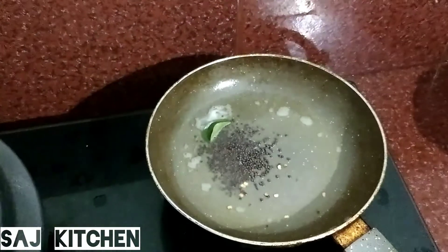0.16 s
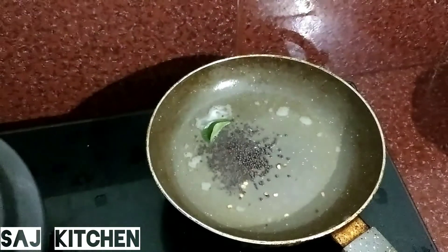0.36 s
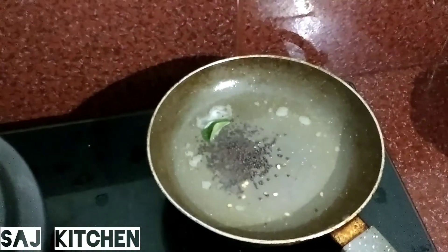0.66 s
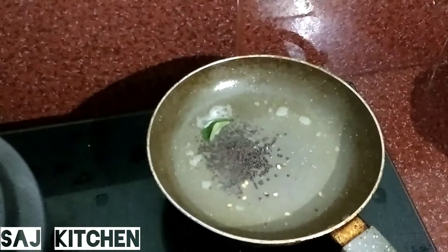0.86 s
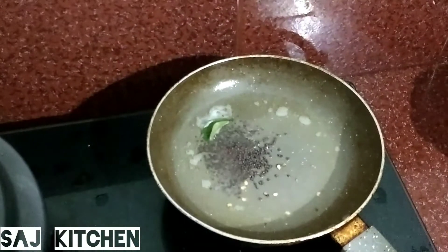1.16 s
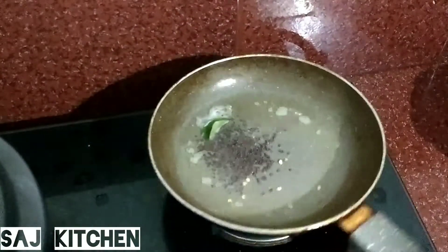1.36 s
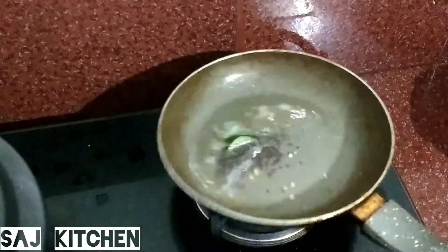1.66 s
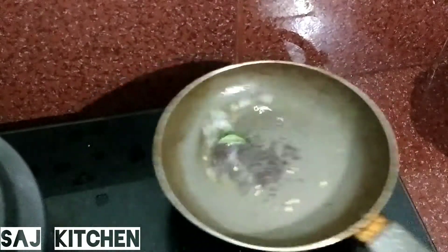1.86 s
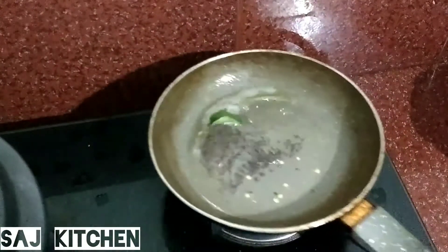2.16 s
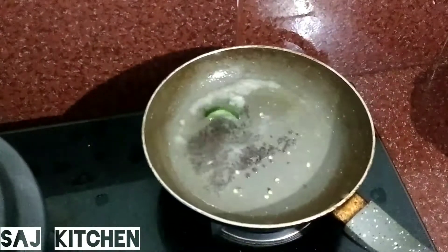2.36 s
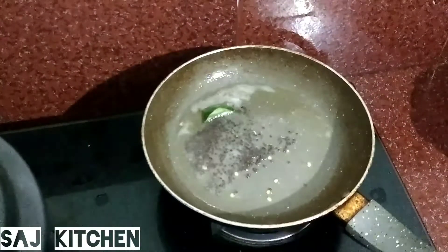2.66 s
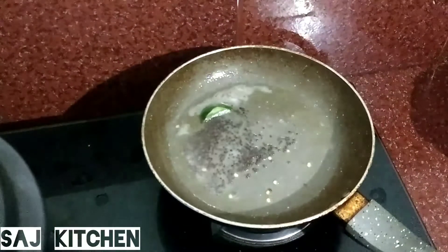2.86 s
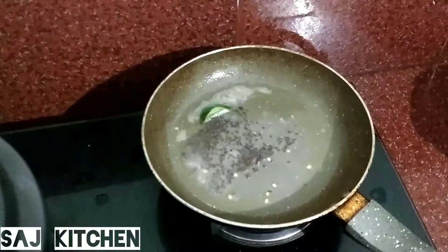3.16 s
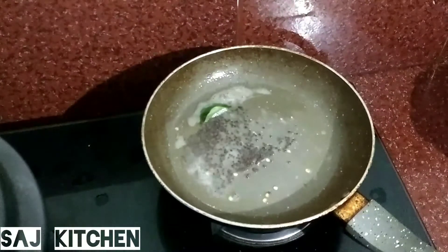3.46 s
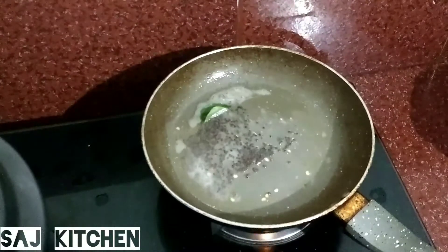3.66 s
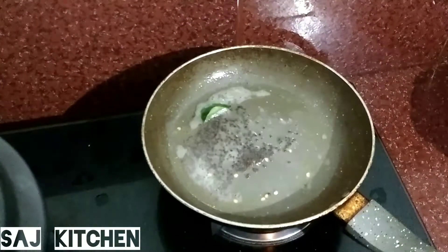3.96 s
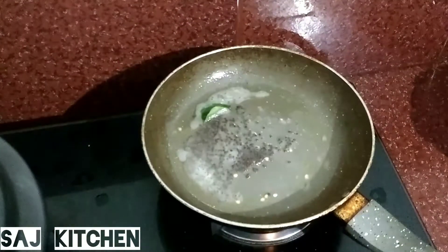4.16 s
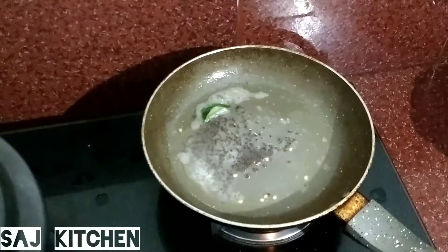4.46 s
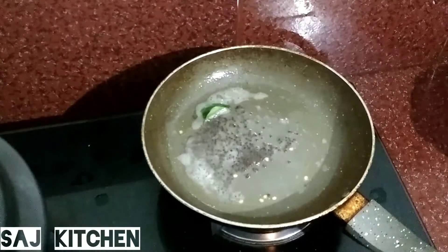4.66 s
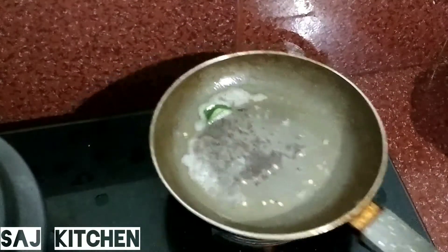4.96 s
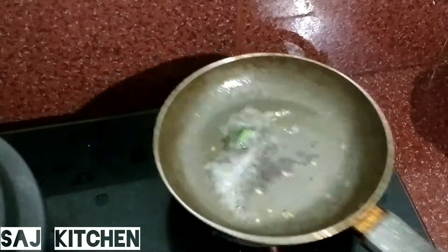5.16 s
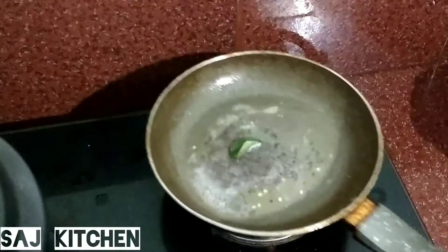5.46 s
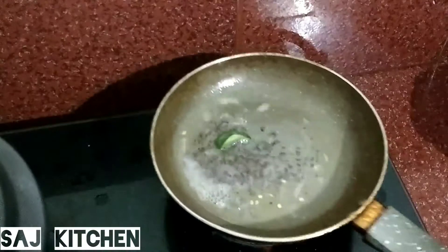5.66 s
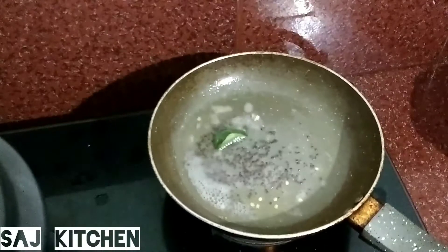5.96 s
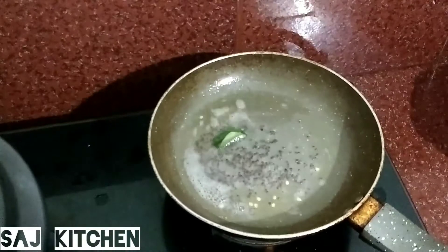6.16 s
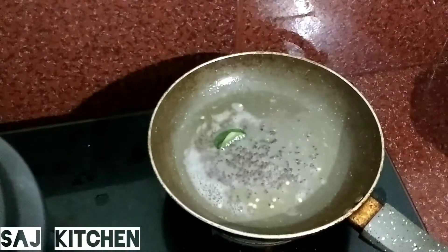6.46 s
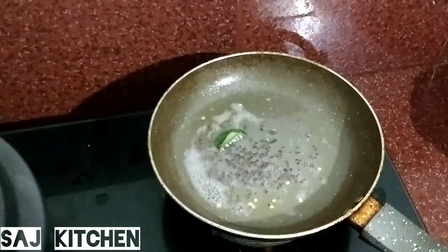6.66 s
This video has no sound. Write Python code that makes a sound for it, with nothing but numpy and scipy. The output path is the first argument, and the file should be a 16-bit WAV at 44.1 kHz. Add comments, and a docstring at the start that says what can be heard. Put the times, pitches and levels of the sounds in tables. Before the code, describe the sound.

In a reverberant home kitchen, something slides briefly, then a steel vessel clangs brightly and rattles. The frying pan bangs and scrapes on its trivet in an uneven run. Afterwards hot oil sizzles faintly while mustard seeds pop one by one, two dull put-down knocks intervene, and the pan scrapes again softly over a brief low rumble. Close stereo phone pickup.

```python
"""Hot oil and mustard seeds in a pan on a gas stove, heard at a phone's two ports in a hard-walled kitchen.
Throughout: filtered clicks as froth and a high hiss, noise as air. First something slides further off (hiss,
sinking note), then a steel vessel clangs and rattles and the pan knocks and scrapes on its trivet (struck,
rubbed modes). Seeds pop from then on (click, ring, steam); midway a duller object is put down twice (damped
modes). Later the pan knocks and scrapes again, ending over a low rumble (wavering tone, noise)."""
import sys
import numpy as np
from scipy import signal
from scipy.fft import rfft, irfft, next_fast_len
from scipy.io import wavfile
from scipy.ndimage import uniform_filter1d

SR = 44100
rng = np.random.default_rng(int(sys.argv[2]) if len(sys.argv) > 2 else 0)


def unload_wav(signal):
    """Save mono or channel-first audio to the path in sys.argv[1] as 16-bit WAV at rate SR, clipped to [-1, 1]."""
    wavfile.write(
        sys.argv[1],
        SR,
        np.round(np.clip(np.atleast_2d(signal).T, -1, 1) * 32767).astype(np.int16),
    )


N = 299423
T = np.arange(N) / SR

# kitchen air spectrum: freq_hz, density_db_per_hz
AIR_COLOUR = [(18, -55), (30, -36), (87, -6), (128, -9), (157, -4), (378, -5.5), (651, -2.5), (1120, -1),
              (1530, -10), (1700, -9.5), (2500, -12.5), (2990, -10.5), (3680, -6), (8210, -16.5),
              (14500, -22)]
# high hiss, swelling with the vessel clatter and the pan noise: time_s, level_db
HISS_LEVEL = [(0.0, -65), (0.5, -67), (0.76, -55), (1.5, -57), (1.9, -58), (2.29, -55), (2.42, -60),
              (3.0, -62), (4.95, -64.5), (5.12, -54.5), (6.0, -62.5), (6.79, -59.5)]
# swells of large bubbles frothing in the oil: start_s, length_s, level_db
FROTH_SWELLS = [(2.48, 0.12, -60), (3.475, 0.15, -50), (4.208, 0.56, -55), (4.908, 0.68, -57)]
# reverberation time: freq_hz, t60_s
ROOM_T60 = [(100, 0.63), (500, 0.68), (2000, 0.66), (6000, 0.63), (14000, 0.3)]
# port mismatch: freq_hz, left_minus_right_db
PORT_BALANCE = [(60, 18), (110, 11.5), (200, 14.5), (380, 8.5), (700, -3), (1290, 1), (2380, 0),
                (4400, -0.5), (8120, 0), (15000, 5)]
# sliding friction spectrum: freq_hz, density_db_per_hz
SLIDE_COLOUR = [(35, -46), (60, 13.5), (160, -11.5), (234, -3.5), (418, -19), (780, -3.5), (1270, -7.5),
                (1600, -10.5), (4020, -11.5), (5060, -13.5), (9020, -20), (13700, -40), (15000, -62)]
# blows: start_s, peak_db, favoured_mode_hz, bass_share_db, treble_share_db, left_minus_right_db (held to +-8)
VESSEL_BLOWS = [(0.4391, -4, 3614, -28.5, -5.5, -0.5), (0.7103, -25, 1553, -11, -27, 9),
                (0.7311, -23, 3654, -7, -40, 5), (0.841, -18, 2220, -7, 2, 17)]
BLOCK_BLOWS = [(3.42, -34, 834, -19, -23, 0.0), (3.495, -17, 805, -17, -13, -0.5),
               (4.153, -27, 822, -11, -18.5, 0.0)]
PAN_BLOWS = [(1.368, -26, 980, -20.5, -34, 0), (1.516, -22, 924, -35.5, -32, 2),
             (1.587, -5, 883, -9, -12, 0), (1.686, -7, 943, -38, -26.5, 5),
             (1.762, -10, 1545, -23, -28.5, -0.5), (1.803, -17, 895, -49, -26, 0),
             (1.845, -13.5, 1572, -19, -30, -1), (2.174, -14, 1532, -20.5, -13, -1),
             (2.206, -6, 1020, -21.5, -15, -2.5), (2.31, -20, 1607, -31.5, -21.5, 8),
             (5.004, -24.5, 1070, -16, -9, -1), (5.084, -28.5, 1014, -29, -24, -1),
             (5.121, -31, 960, -3, -8, -3), (5.18, -30, 976, -8, -19, -6),
             (5.26, -18, 1584, -16, -29, -3.5)]
# resonances of each body: freq_hz, width_hz, level_db
VESSEL_MODES = [(760, 143, -20.5), (1210, 30, -4.5), (1402, 150, -9), (1585, 67, -7.5), (1750, 79, -8.5),
                (1880, 53, -7.5), (2132, 50, 0.5), (2275, 59, -5), (2480, 43, -7.5), (2827, 110, -2.5),
                (3190, 140, -7), (3606, 14, -2), (3676, 25, 2), (3718, 22, 7), (4040, 65, -14),
                (4120, 41, -1), (5160, 68, -7), (6097, 53, 5), (6150, 110, -4), (6480, 51, -9.5),
                (7550, 46, -4), (9084, 27, 2), (9025, 62, -4.5), (9500, 24, -32), (10170, 38, -25),
                (11940, 50, -18), (12300, 50, -20), (12600, 51, -30), (13200, 60, -29)]
BLOCK_MODES = [(246, 30, -34), (320, 35, -7), (437.5, 13, 7), (523, 25, 6), (654, 52, 2), (776, 26, 6.5),
               (1094, 61, -5), (1480, 340, 0.5), (2180, 190, -36), (2810, 93, 4.5), (3500, 150, -37),
               (4380, 270, -14)]
PAN_MODES = [(170.5, 6, -10.5), (236.3, 16.3, -13), (292.3, 3.2, -13.5), (465, 16, -8), (545.4, 15, -5.5),
             (637, 2.9, -11.5), (797, 31, -8), (901, 27, -6), (1004, 54, -16.5), (1160, 17.6, -5),
             (1232, 98, -11), (1461, 59, -5.5), (1551, 22, -2), (1805, 190, -12), (2090, 16, -34),
             (2464, 125, -8.5), (3203, 20, -24), (3510, 85, -20), (4030, 45, -23), (5310, 350, -20),
             (6315, 120, -30), (7400, 200, -41)]
# contact crack spectrum: freq_hz, density_db_per_hz
VESSEL_CRACK = [(180, -68), (300, -21.5), (1230, 2), (3120, -10), (3610, 5.5), (4620, -11), (6840, -17),
                (9180, -18.5), (13400, -33.5), (15000, -42)]
BLOCK_CRACK = [(59, -51), (100, -14), (814, 5), (1210, -7), (2990, -5.5), (4640, -12.5), (5150, -23),
               (9460, -28), (13200, -36), (15000, -51)]
PAN_CRACK = [(59, -40), (100, -21.5), (633, -0.5), (962, -4.5), (2000, -7), (2470, -14), (2990, -14.5),
             (8520, -24), (13500, -44), (15000, -57)]
# rubbing strokes: start_s, length_s, level_db, upper_over_lower_modes_db, favoured_mode_hz
VESSEL_STROKES = [(0.44, 0.087, -30.5, 0, 3600), (0.55, 0.11, -45.5, -3, 3400),
                  (0.705, 0.096, -37, -11.5, 1330), (0.835, 0.013, -35.5, -3, 2430),
                  (0.88, 0.071, -50.5, -6, 2300)]
BLOCK_STROKES = [(3.47, 0.051, -39, -17, 452), (4.13, 0.05, -46, 1, 790)]
PAN_STROKES = [(1.36, 0.1, -58.5, 8, 937), (1.465, .075, -41.5, 3.5, 905), (1.6, .1, -36, 2, 884),
               (1.77, 0.072, -45.5, 7, 905), (1.86, 0.15, -53, 7.5, 1510), (2.2, 0.1, -44.5, 1, 1080),
               (4.92, 0.13, -55.5, 0.5, 1590), (5.05, 0.048, -55, 2, 975), (5.17, 0.11, -54.5, 2, 1000),
               (5.27, 0.22, -53, -11.5, 1550), (5.46, 0.37, -56.5, -0.5, 1634)]
# seeds bursting: start_s, peak_db, ring_hz, left_minus_right_db (held to +-8), steam_db
SEED_POPS = [(1.893, -28, 7230, -7, -16), (2.1274, -37, 8580, -8, -23), (2.5948, -31, 6740, 7, -24),
             (2.6792, -40, 9300, 7, -22), (2.7834, -29, 7900, 8, -25), (2.842, -39, 7250, -4, -22),
             (3.2795, -29, 8840, -1, -21), (3.606, -35, 9810, 9, -24), (4.302, -18.5, 8300, 13, -35),
             (4.672, -34, 8160, 8, -19), (4.9387, -32.5, 9000, 8, -9), (5.957, -36.5, 9200, 10, -24),
             (6.123, -41, 8900, 9, -22), (6.276, -21, 8180, 10, -12), (6.4721, -41, 9200, 10, -18),
             (6.727, -35, 9440, 8, -23)]

AIR_DB = -55
FROTH_HZ, FROTH_WIDTH_HZ = 2780, 4700  # one pass of two
FROTH_FLOOR_DB, FROTH_ATTACK_S, FROTH_RELEASE_S = -64.5, 0.13, 0.056
RUMBLE_HZ, RUMBLE_WIDTH_HZ = 96, 15
RUMBLE_S, RUMBLE_LENGTH_S, RUMBLE_DB = 5.31, 0.43, -51.5
RUMBLE_ATTACK_S, RUMBLE_RELEASE_S = 0.092, 0.08
SLIDE_S, SLIDE_LENGTH_S, SLIDE_DB = 0.0795, 0.336, -46
SLIDE_ATTACK_S, SLIDE_RELEASE_S = 0.034, 0.021
SLIDE_HZ, SLIDE_SAG_HZ_PER_S = 308, 150
SOFTENING = 0.4  # dB of contact time gained per dB of lighter blow
POP_CLICK_DB = -9.5
NOTCH_HZ, NOTCH_WIDTH_HZ, NOTCH_DEPTH = 5165, 1100, 0.55
PORT_LAG_S = 0.00005
FADE_HZ, FADE_DB, TOP_HZ = 14350, -32, 15600


def undb(db):
    """Amplitude ratio of a level in dB."""
    return 10 ** (np.asarray(db) / 20)


def level(x, db):
    """Set the RMS level."""
    return x * undb(db) / np.sqrt(np.mean(x ** 2))


def read(table, hz):
    """Value of a (freq_hz, value) table on a log-frequency axis."""
    freq_hz, value = np.transpose(table)
    return np.interp(np.log(np.maximum(hz, 1)), np.log(freq_hz), value)


def curve(table):
    """Gain of a (time_s, level_db) curve."""
    return undb(np.interp(T, *np.transpose(table)))


def colour(x, gain):
    """Filter by a gain given as a function of frequency."""
    size = next_fast_len(N + SR)
    return irfft(rfft(x, size) * gain(np.fft.rfftfreq(size, 1 / SR)), size)[..., :N]


def resonance(hz, centre_hz, width_hz):
    """Response of one damped mode, unity at its centre."""
    return 1j * hz * width_hz / (centre_hz ** 2 - hz ** 2 + 1j * hz * width_hz)


def walk(rate_hz):
    """Random levels held 1 / rate_hz and slewed twice."""
    k = int(SR / rate_hz)
    steps = np.repeat(rng.standard_normal(N // k + 1), k)
    return uniform_filter1d(uniform_filter1d(steps, k), k)[:N]


def pair(split_hz, size):
    """Two noises that agree in the bass and part above split_hz."""
    both, left, right = rfft(rng.standard_normal((3, size)))
    share = 1 / (1 + (np.fft.rfftfreq(size, 1 / SR) / split_hz) ** 2)
    return irfft(np.sqrt(share) * both + np.sqrt(1 - share) * np.array([left, right]), size)


def grit(rate_hz, spread_db, channels):
    """Random clicks: most small, a few larger."""
    chance = rng.random((3, channels, N))
    size = np.minimum(-np.log(1 - chance[1]), 3.5)
    return (chance[0] < rate_hz / SR) * undb(spread_db * size) * np.sign(chance[2] - 0.5)


def swell(start_s, length_s, db, attack_s, release_s):
    """Gain that rises at start_s, holds until length_s has passed and dies away."""
    rise = np.clip((T - start_s) / attack_s, 0, 1) ** 2
    return undb(db) * rise * np.exp(-np.maximum(T - start_s - length_s, 0) / release_s)


def add(out, start_s, sound, peak_db, pan_db):
    """Place a sound at its peak level and side."""
    i, pan_db = int(start_s * SR), np.clip(pan_db, -8, 8)
    sound = sound[..., :N - i] / np.abs(sound).max()
    out[:, i:i + sound.shape[-1]] += sound * undb(peak_db + np.array([[pan_db], [-pan_db]]) / 2)


def room(onset_s):
    """Kitchen tail at both ports: noise whose octaves fade at their own speed."""
    noise, t, tail = pair(615, SR), T[:SR], 0
    for hz in 62.5 * 2.0 ** np.arange(9):
        edges_hz = [hz / np.sqrt(2), min(hz * np.sqrt(2), 0.49 * SR)]
        band = signal.sosfilt(signal.butter(2, edges_hz, "band", fs=SR, output="sos"), noise)
        tail = tail + band * np.exp(-np.log(1000) * t / read(ROOM_T60, hz))
    tail = tail * np.clip(t / onset_s, 0, 1)
    return tail / np.sqrt((tail ** 2).sum(axis=1, keepdims=True))


def kitchen_air():
    """Steady broadband noise, its level wavering slightly."""
    air = colour(pair(360, N), lambda f: undb(read(AIR_COLOUR, f)))
    return level(air, AIR_DB) * undb(0.66 * walk(7.7))


def froth_and_hiss():
    """Random clicks through a broad band (bubbles frothing in the oil) and a higher band (hiss)."""
    grains = grit(4000, 4.1, channels=2)
    froth = level(colour(grains, lambda f: resonance(f, FROTH_HZ, FROTH_WIDTH_HZ) ** 2), 0)
    swells = sum(swell(*row, FROTH_ATTACK_S, FROTH_RELEASE_S) for row in FROTH_SWELLS)
    froth = froth * (undb(FROTH_FLOOR_DB) + swells)
    # sparse louder clicks stand out of the hiss
    grains = grains + undb(14) * grit(25, 2.5, channels=1)
    hiss = level(colour(grains, lambda f: resonance(f, 7700, 3700) ** 2), 0)
    return froth + hiss * curve(HISS_LEVEL) * undb(1.1 * walk(4.62))


def rumble():
    """Stove-top hum, wavering in pitch and level, over low resonant noise."""
    turns = RUMBLE_HZ * np.cumsum(1 + 0.019 * walk(19)) / SR
    hum = level(np.sin(2 * np.pi * turns) * undb(1.8 * walk(17)), -5.5)

    def shape(f):
        low = resonance(f, RUMBLE_HZ, RUMBLE_WIDTH_HZ) + undb(-28) * resonance(f, 47, 40)
        return low + undb(4) * resonance(f, 186, 115)

    noise = level(colour(rng.standard_normal(N), shape), 0.5)
    envelope = swell(RUMBLE_S, RUMBLE_LENGTH_S, RUMBLE_DB, RUMBLE_ATTACK_S, RUMBLE_RELEASE_S)
    return envelope * (hum + noise)


def slide():
    """Friction hiss plus a hollow body note that sinks as the object slows."""
    note_hz = SLIDE_HZ - SLIDE_SAG_HZ_PER_S * np.clip(T - SLIDE_S, 0, SLIDE_LENGTH_S)
    phase = 2 * np.pi * np.cumsum(note_hz) / SR
    note = level(walk(87.7) * np.cos(phase) + walk(89) * np.sin(phase), -15)
    hiss = level(colour(rng.standard_normal(N), lambda f: undb(read(SLIDE_COLOUR, f))), 0)
    envelope = swell(SLIDE_S, SLIDE_LENGTH_S, SLIDE_DB, SLIDE_ATTACK_S, SLIDE_RELEASE_S)
    return envelope * (hiss * undb(1.8 * walk(27.6)) + note)


def blows(hits, modes, crack_colour, knee_hz, favour_db, contact_ms_at_0db,
          clank_db, clank_s, crack_db, crack_s):
    """Each blow lands elsewhere, so the modes ring in a new mix; a damped clank and a crack lead."""
    out, t = np.zeros((2, N)), T[:SR // 2]
    hz, width_hz, mode_db = np.transpose(modes)[:, :, None]
    f = np.fft.rfftfreq(len(t), 1 / SR)[1:]
    usual_bass_db, usual_treble_db = np.mean(hits, axis=0)[3:5]
    for start_s, peak_db, favour_hz, bass_db, treble_db, pan_db in hits:
        def tilt(f):
            # soft contacts give more bass, hard ones more treble than the usual blow
            bass = (bass_db - usual_bass_db) * np.clip(np.log2(knee_hz / f / 2), 0, 1)
            return bass + (treble_db - usual_treble_db) * np.clip(np.log2(f / knee_hz), 0, 1)

        chance = rng.standard_normal((3, len(modes), 1))
        mix_db = mode_db + tilt(hz) + 2.0 * chance[0]
        mix_db = mix_db + favour_db * np.exp(-(np.log(hz / favour_hz) / 0.04) ** 2)
        # higher modes reach the two ports out of step
        skew = chance[2] * np.minimum(hz / 1500, 1) * np.array([0.5, -0.5])[:, None, None]
        phase = 2 * np.pi * (hz * t + chance[1]) + skew
        decay = np.exp(-np.pi * width_hz * t)
        ring = (undb(mix_db) * width_hz * decay * np.sin(phase)).sum(axis=1)
        clank = undb(clank_db) * np.exp(-t / clank_s) * (1 - np.exp(-t / 0.0037))
        clank = clank * np.sin(2 * np.pi * favour_hz * t)
        spectrum = rfft(pair(1820, len(t)))[:, 1:] * undb(read(crack_colour, f) + tilt(f))
        crack = irfft(np.pad(spectrum, ((0, 0), (1, 0))), len(t))
        crack = level(crack, crack_db) * np.exp(-t / crack_s)
        # a lighter blow presses longer
        contact_ms = contact_ms_at_0db * undb(-SOFTENING * peak_db)
        rise = 1 - np.exp(-(1000 * t / contact_ms) ** 2)
        add(out, start_s, rise * (ring / np.abs(ring).max() + clank + crack), peak_db, pan_db)
    return out


def rubbing(strokes, modes, bare_colour, attack_s, release_s, split_hz, rate_hz, spread_db,
            bare_db, spot_q, spot_db):
    """Dense uneven catches drive the lower and the upper modes of the body, stroke by stroke."""
    out, catches = 0, grit(rate_hz, spread_db, channels=1)

    def body(f):
        gain = undb(bare_db + read(bare_colour, f))
        for k, (hz, width_hz, db) in enumerate(modes):
            gain = gain + (-1) ** k * undb(db) * resonance(f, hz, width_hz)
        return gain

    def lower(f):
        return body(f) / (1 + (f / split_hz) ** 4)

    def upper(f):
        return body(f) - lower(f)

    for is_upper, part in enumerate((lower, upper)):
        rms = np.sqrt(np.mean(colour(catches, part) ** 2))
        push = sum(swell(start_s, length_s, db + is_upper * upper_db, attack_s, release_s)
                   for start_s, length_s, db, upper_db, _ in strokes)
        out = out + colour(catches * push / rms, part)
    for start_s, length_s, db, upper_db, favour_hz in strokes:
        # the spot that is rubbed sings in its own broad mode
        spot = level(signal.lfilter(*signal.iirpeak(favour_hz, spot_q, SR), catches), spot_db)
        out = out + spot * swell(start_s, length_s, db + upper_db, attack_s, release_s)
    return out


def vessel():
    """Steel vessel: narrow modes struck into a clang, then rattled."""
    struck = blows(VESSEL_BLOWS, VESSEL_MODES, VESSEL_CRACK, knee_hz=3120, favour_db=17.0,
                   contact_ms_at_0db=0.66, clank_db=-1.5, clank_s=0.023, crack_db=0.43, crack_s=0.0048)
    rubbed = rubbing(VESSEL_STROKES, VESSEL_MODES, VESSEL_CRACK, attack_s=0.009, release_s=0.029,
                     split_hz=2460, rate_hz=1500, spread_db=1.3, bare_db=-18.0, spot_q=39, spot_db=-4)
    return struck + rubbed


def block():
    """Dull object: broad damped modes knocked, with a scuff on the counter as it lands."""
    struck = blows(BLOCK_BLOWS, BLOCK_MODES, BLOCK_CRACK, knee_hz=1200, favour_db=8.3,
                   contact_ms_at_0db=1.4, clank_db=-8, clank_s=0.0081, crack_db=-8, crack_s=0.011)
    rubbed = rubbing(BLOCK_STROKES, BLOCK_MODES, BLOCK_CRACK, attack_s=0.021, release_s=0.021,
                     split_hz=5300, rate_hz=3000, spread_db=1.0, bare_db=-4, spot_q=14, spot_db=-1.5)
    return struck + rubbed


def pan():
    """Swirled pan: modes knocked on the trivet, scraped between the blows."""
    struck = blows(PAN_BLOWS, PAN_MODES, PAN_CRACK, knee_hz=1410, favour_db=5.3,
                   contact_ms_at_0db=0.8, clank_db=-1.0, clank_s=0.0049, crack_db=-8.0, crack_s=0.0039)
    rubbed = rubbing(PAN_STROKES, PAN_MODES, PAN_CRACK, attack_s=0.035, release_s=0.031,
                     split_hz=574, rate_hz=1500, spread_db=0.57, bare_db=-11.5, spot_q=29, spot_db=-6)
    return struck + rubbed


def pops():
    """A seed coat bursts: a sharp click, a brief high ring, a spit of steam."""
    out, t = np.zeros((2, N)), T[:SR // 4]
    for start_s, peak_db, ring_hz, pan_db, steam_db in SEED_POPS:
        noise = rng.standard_normal((2, len(t)))
        click = undb(POP_CLICK_DB) * noise[0] * np.exp(-t / 0.0003)
        ring = np.sin(2 * np.pi * ring_hz * t) * np.e * t / 0.00014 * np.exp(-t / 0.00017)
        steam = signal.lfilter(*signal.iirpeak(ring_hz, 2.5, SR), noise[1])
        steam = undb(steam_db) * steam * np.exp(-t / 0.018) * np.clip(t / 0.0038, 0, 1)

        def later(lag_s):
            return np.pad(click + ring, (int(lag_s * SR), 0))[:len(t)]

        # a faint split leads the burst, and the wall of the pan throws it back at once
        burst = undb(-11) * later(0) + later(0.0015) + undb(-3.5) * later(0.0026)
        add(out, start_s, burst + steam, peak_db, pan_db)
    return out


def scene():
    """Sum the objects with their room tail, then the rumble, froth, hiss and air."""
    far, steel, dull, knocks, seeds = slide(), vessel(), block(), pan(), pops()
    near = far + steel + dull + knocks + seeds
    # what stands further from the phone is heard more by way of the walls
    send = undb(6.0) * far + undb(3.0) * steel + undb(2.5) * dull + undb(1.0) * knocks + undb(-5.0) * seeds
    heard = near + signal.fftconvolve(send.mean(axis=0)[None], room(onset_s=0.0028))[:, :N]
    # small objects radiate almost no deep bass
    heard = signal.sosfilt(signal.butter(6, 140, "high", fs=SR, output="sos"), heard)
    return heard + rumble() + froth_and_hiss() + kitchen_air()


def record(dry):
    """The two ports differ in colour and lie slightly apart; the treble edge fades, then is cut."""
    def response(f):
        # the housing cancels a narrow band in front of both ports
        notch = 1 - min(NOTCH_DEPTH, 1) * resonance(f, NOTCH_HZ, NOTCH_WIDTH_HZ)
        fade = undb(FADE_DB * np.clip((f - FADE_HZ) / 150, 0, 1))
        balance = undb(np.array([[0.5], [-0.5]]) * read(PORT_BALANCE, f))
        lag = np.exp(-2j * np.pi * f * PORT_LAG_S * np.array([[0], [1]]))
        return balance * lag * fade * notch

    cut = signal.ellip(8, 0.2, 60, TOP_HZ, fs=SR, output="sos")
    return signal.sosfilt(cut, colour(dry, response))


dry = scene()
out = record(dry)
unload_wav(out)
```